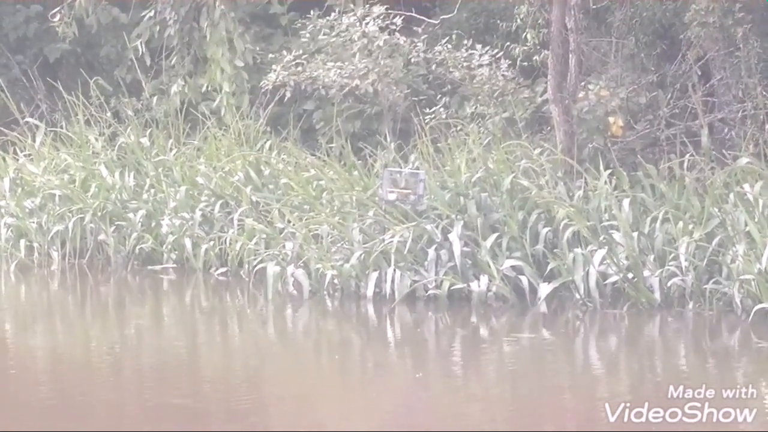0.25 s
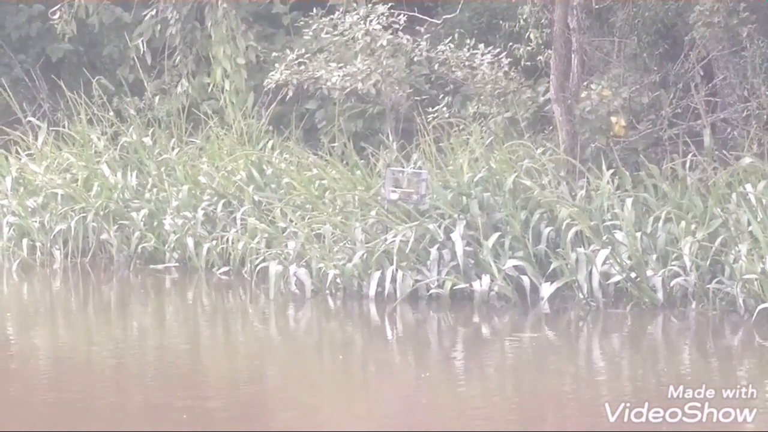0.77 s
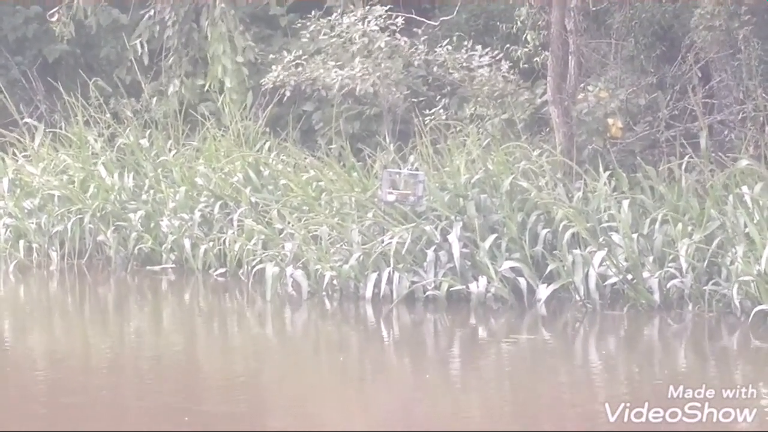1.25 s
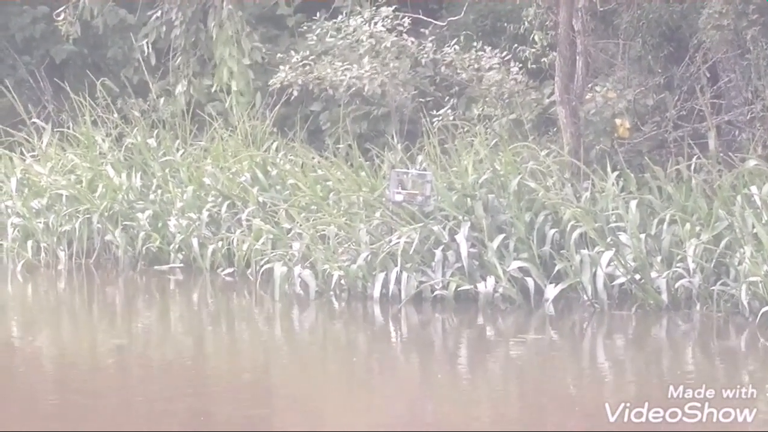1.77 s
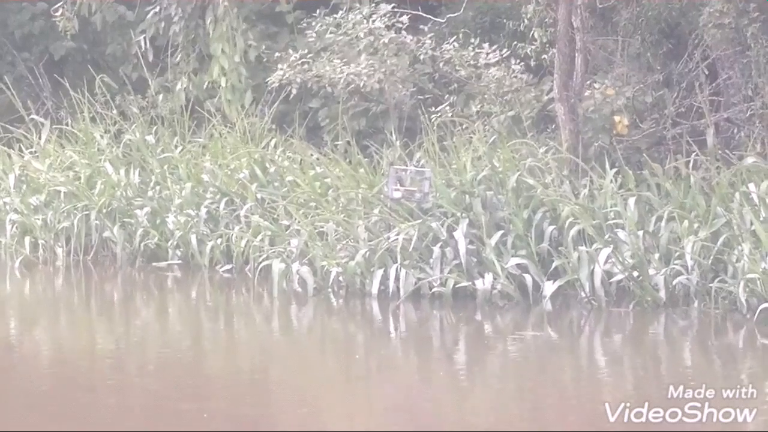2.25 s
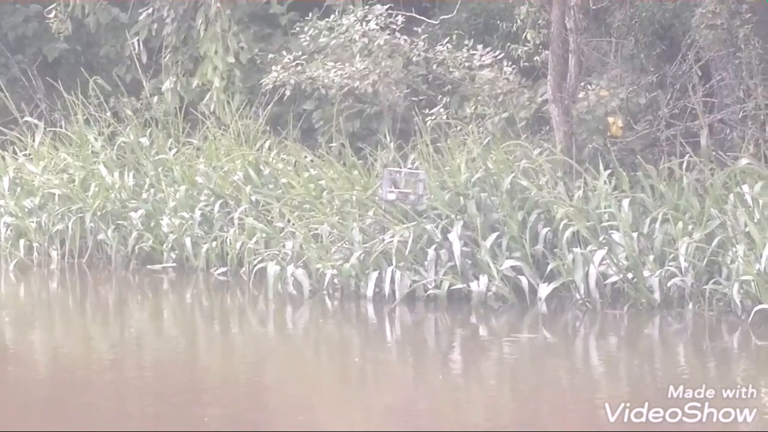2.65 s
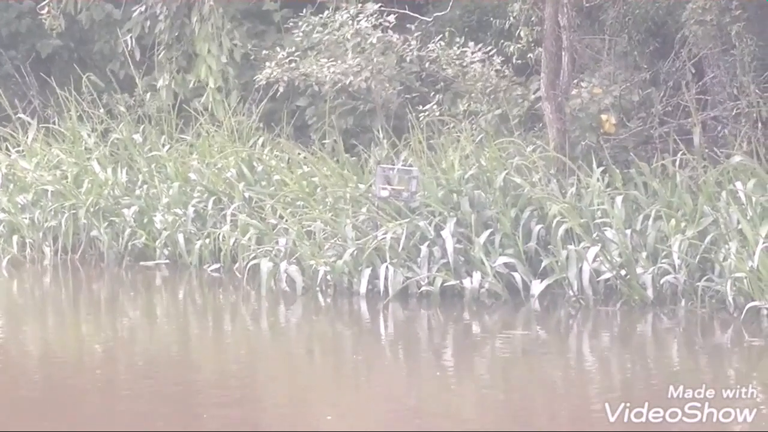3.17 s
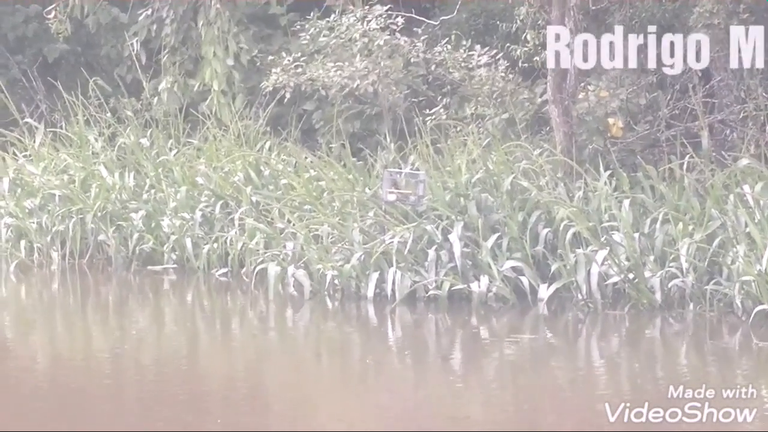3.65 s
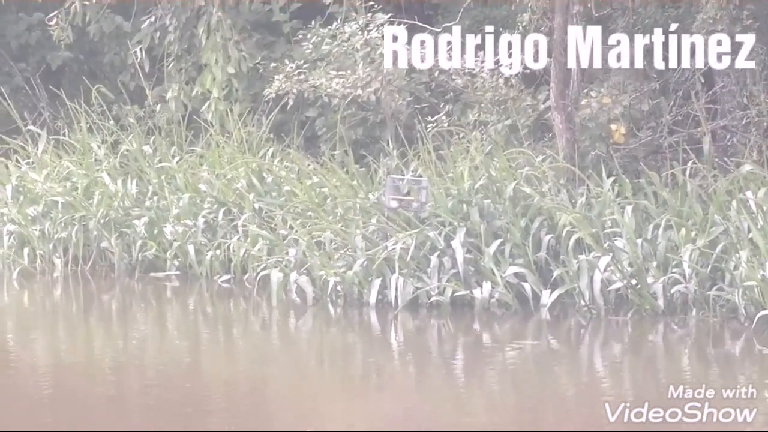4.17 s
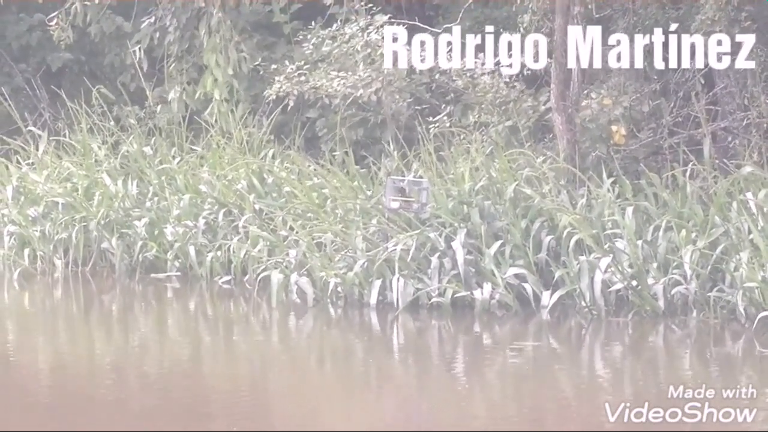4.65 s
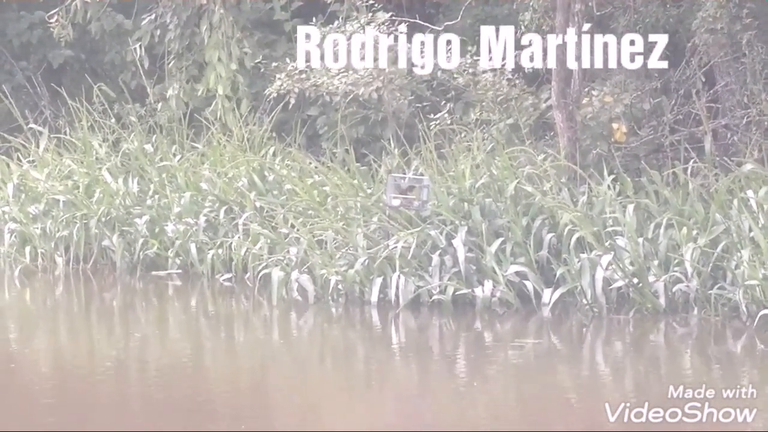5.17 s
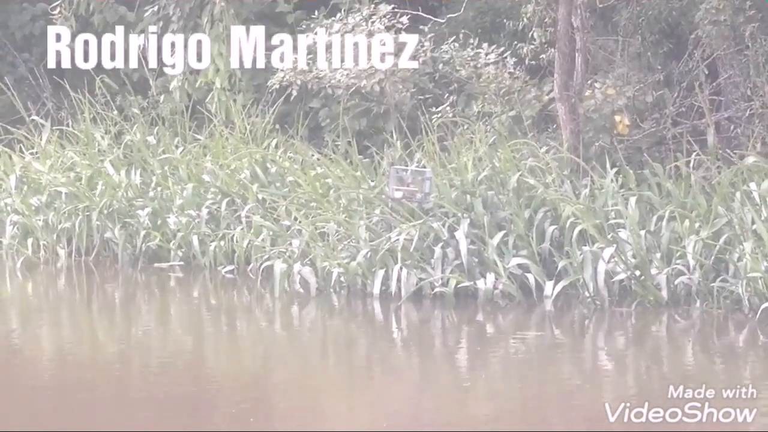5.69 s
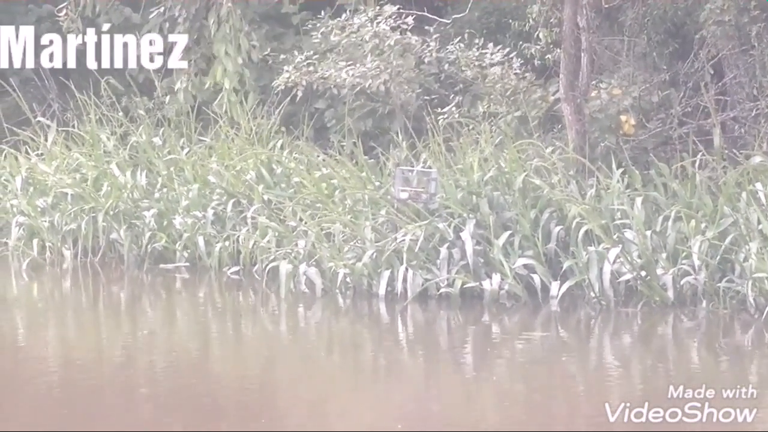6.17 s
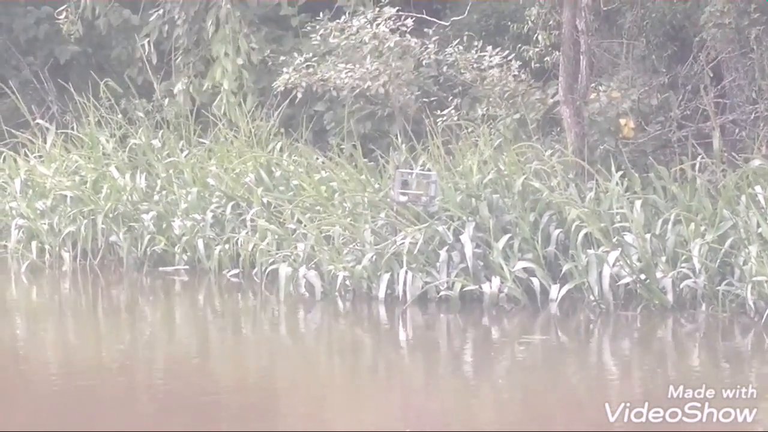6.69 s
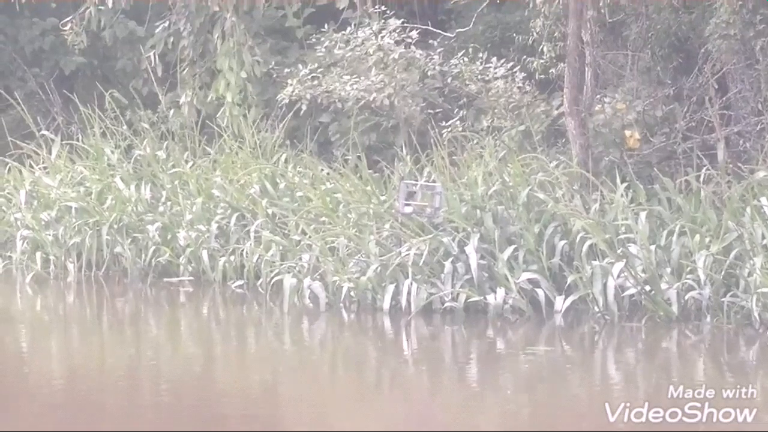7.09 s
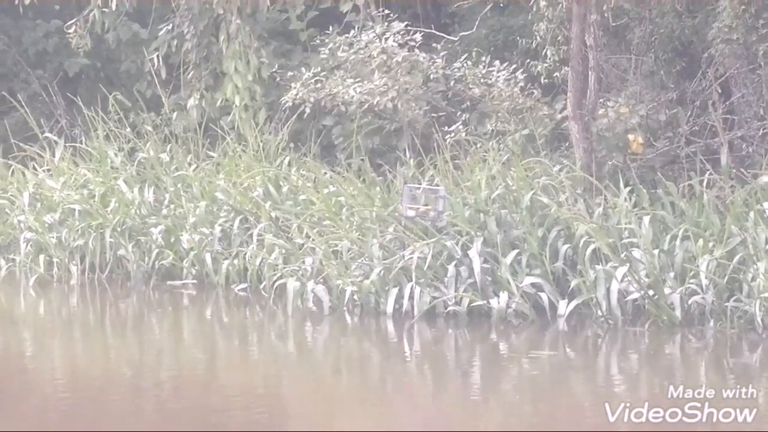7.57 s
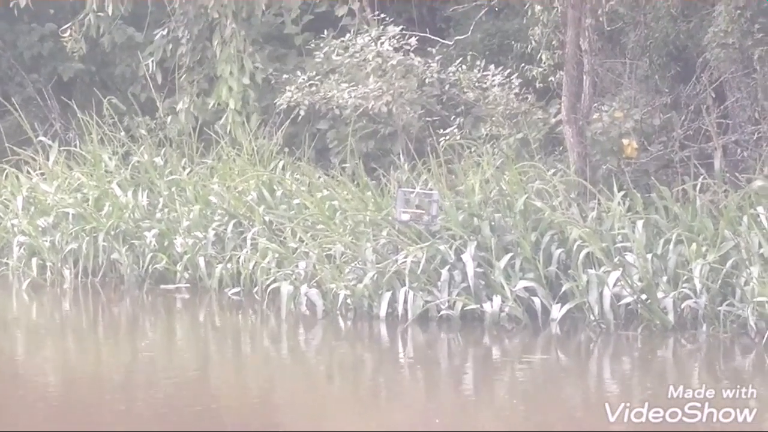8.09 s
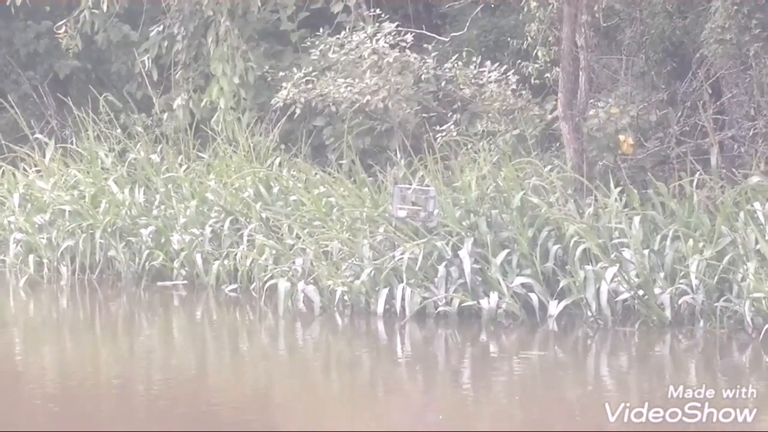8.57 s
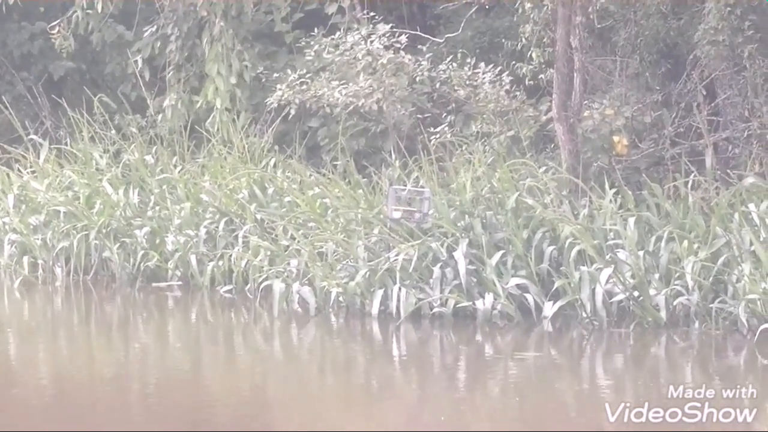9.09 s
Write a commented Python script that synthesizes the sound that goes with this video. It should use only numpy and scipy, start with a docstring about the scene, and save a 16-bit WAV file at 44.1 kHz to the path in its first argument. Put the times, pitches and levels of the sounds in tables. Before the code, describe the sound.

At a lagoon's wooded edge, a loud arched whistle opens over high pulsing insects on the left and soft forest hush. Chirps lead into a fast falling trill, a short warbling buzz and rasping chatter. After a quieter gap the whistle returns, then mostly insects, faint thin calls and tiny water plops remain. Low wind rumble and handling bumps sit mainly on the right of the stereo microphone.

```python
"""Songbirds at the wooded edge of a lagoon, built from gliding sines and harmonic stacks: two long arched
whistles, a trill, a falling buzz, rasping chatter, small chirps and, far off, twitters and low hoots.
Shaped noise and one pure tone make insects throb on the left; the water plops as rising, dying bubble tones.
Trees scatter the water and all calls but the hoots, as sparse random echoes.
Low noise gives the rumble of light wind and handling bumps on the microphone, over a steady forest hush."""
import sys
import numpy as np
from scipy import signal
from scipy.fft import rfft, irfft, next_fast_len
from scipy.io import wavfile
from scipy.ndimage import uniform_filter1d

SR = 44100
rng = np.random.default_rng(int(sys.argv[2]) if len(sys.argv) > 2 else 0)


def to_wav(s):
    """Save 16-bit WAV."""
    ch = np.atleast_2d(s).T  # columns
    pcm = np.round(np.clip(ch, -1, 1) * 32767)  # PCM
    wavfile.write(sys.argv[1], SR, pcm.astype(np.int16))


N = 411894
T = np.arange(N) / SR  # seconds
TOP_HZ = 14900  # upper limit of the recorder

# Spectra, normalised when used. Each row: frequency in Hz, relative level in dB.
# Forest hush: its body and its treble; the lists overlap, so their joining order matters.
HUSH_BODY = [(12, -23), (20, 1.5), (43, 5), (80, -3.5), (285, -12), (422, -12), (597, -17), (1580, -22),
             (3010, -22), (3970, -22.5), (5000, -23), (6500, -57.5), (11000, -120)]
HUSH_TREBLE = [(7000, -31), (9500, -21.5), (12500, -31), (15000, -42)]
INSECT_COLOUR = [(4800, -38.5), (5700, -20), (6150, -11), (6480, 0.5), (6750, -11), (7150, -8.5),
                 (7500, -21), (7900, -26), (8900, -24), (9300, -29.5), (12500, -40.5)]
RUMBLE_COLOUR = [(10, -16.0), (30, 5.0), (60, 2.0), (95, -3.0), (130, -14), (220, -26.5),
                 (600, -57), (3000, -69)]
HAZE_COLOUR = [(2700, -48), (3300, -2.0), (4000, -9.0), (4900, 0.5), (5300, -14.5), (7000, -31.5),
               (10000, -48.5)]
SPLASH_COLOUR = [(150, -8.0), (400, -3), (1200, -7.5), (2200, -15.0), (12000, -49.5)]
HISS_COLOUR = [(100, 3), (1500, 4.5), (5000, 7), (9000, -20.0), (15000, -40.5)]
# Throat response of the chatter. Each row: frequency in Hz, gain in dB.
CHATTER_THROAT = [(2500, -39.0), (3300, 2.5), (4600, 0), (6000, -0.5), (8000, -5.5), (10000, -22.0),
                  (14000, -36)]

# Handling bumps. Each row: start in seconds, length in seconds, level in dB before a 10 dB lift.
BUMPS = [(0.031, 0.059, -44), (0.176, 0.12, -65), (0.522, .1, -72), (1.06, 0.14, -63), (1.567, 0.042, -63),
         (5.712, 0.06, -66)]
# Rumble reaches the left capsule inverted and 24.5 dB weaker. Each row: gain of the left, then the right.
CAPSULES = np.array([[-10 ** (-24.5 / 20)], [1]])

# Insect chorus, joined by straight lines. Each row: time in seconds, level in dB.
INSECT_LEVEL = [(0.0, -61.5), (1.45, -59), (3.07, -70.5), (3.46, -62.5), (4.11, -66.5), (5.93, -63.5),
                (6.24, -69.5), (8.04, -68), (8.79, -61), (9.34, -60)]
THROB_HZ, THROB_DB = 13.4, 3.6  # mean rate and mean depth of the dips

# Slurred notes. Each row: start in seconds, length in seconds, start pitch in Hz, end pitch in Hz,
# level in dB, left minus right in dB.
SLURRED_NOTES = [(0.453, 0.34, 4400, 3425, -68.5, 36), (0.529, 0.055, 4234, 4120, -54, 32),
                 (1.04, 0.03, 3990, 6300, -54, -7), (1.364, 0.07, 6030, 3680, -47, -1.5),
                 (1.836, .27, 3950, 2750, -61, 18), (2.475, 0.073, 4460, 3610, -37.5, -2),
                 (3.247, 0.083, 4300, 3694, -44.5, -4), (3.375, 0.04, 4100, 3374, -45.5, 0),
                 (3.452, .037, 4140, 3800, -43, 1), (3.949, 0.0246, 2640, 2260, -71, 20),
                 (3.987, 0.13, 4280, 2733, -55, 5), (4.01, 0.056, 4020, 3517, -45.5, -7),
                 (6.14, 0.07, 4940, 3680, -45, -18)]
# High chips, all dropping by the same share. Each row: start in seconds, length in seconds,
# start pitch in Hz, level in dB, left minus right in dB.
CHIPS = [(0.708, 0.023, 7000, -63, -13), (1.21, .07, 6500, -55, -20), (3.646, 0.02, 6880, -53.5, -16),
         (3.807, 0.0178, 6130, -50, -8), (4.04, 0.039, 7200, -55, -2), (8.336, 0.019, 6240, -64, 20),
         (9.046, .018, 6270, -69, 20.5), (9.135, 0.015, 6150, -65, 15)]
CHIP_FALL = .09  # share of the start pitch
# A second bird ticks evenly behind the trill, louder towards the middle of its series.
TICK_START_S, TICK_STEP_S, TICK_S = 2.074, .0527, 0.017
TICK_TOP_HZ, TICK_END_HZ, TICK_DB, TICK_EDGE_DB, TICK_PAN_DB = 4275, 3580, -37, -9.5, -7.5
WOOD_T60_S = .25  # 60 dB decay of the echoes of the chirps, on the left

# Arched whistles. Each row: start in seconds, length in seconds, top pitch in Hz, share of the length
# before it sinks, level in dB, dip of the third harmonic at the top in dB.
WHISTLES = [(0.77, .654, 1698, .43, -35, -17), (5.522, .67, 1673, .35, -35, -9.5)]
# A whistle scoops up from below its top pitch and sinks again (shares of that pitch; scoop time in s).
SCOOP, SCOOP_S, SINK = 0.38, .039, .37

# Water plops. Each row: start in seconds, level in dB before a 4 dB lift, initial pitch in Hz,
# 60 dB decay time in seconds, splash relative to the tone in dB.
PLOPS = [(1.326, -54, 417, 0.037, -1), (2.586, -50, 413, 0.062, -4), (3.689, -55.5, 367, 0.048, -14),
         (4.302, -68.5, 1183, 0.081, -17), (4.701, -69.5, 492, .1, -21), (7.296, -60.5, 1160, 0.077, -23),
         (7.506, -61.5, 400, 0.06, 1), (8.076, -59, 436, 0.035, 6.5), (8.86, -55.5, 374, 0.044, -25.5)]

# Opening notes of the trill, before the throat. Each row: start in seconds, length in seconds,
# start pitch in Hz, end pitch in Hz, level in dB, left minus right in dB.
TRILL_OPENING = [(1.819, 0.032, 3820, 3520, -63.5, 26), (1.883, 0.026, 3850, 3700, -39.5, 32),
                 (1.961, 0.031, 3850, 3310, -38.5, 29), (2.019, 0.039, 3850, 3510, -32.5, 18),
                 (2.129, 0.066, 3806, 2946, -30.5, 12.5), (2.197, .036, 4050, 2900, -29, 11),
                 (2.293, 0.074, 3790, 2843, -29.5, 10)]
# The trill ends in an even run of steep notes, each reaching a little deeper; level before the throat.
RUN_START_S, RUN_STEP_S, RUN_NOTE_S = 2.368, .0643, 0.038
RUN_TOP_HZ, RUN_END_HZ, RUN_DEEPEN_HZ, RUN_DB, RUN_PAN_DB = 4194, 2778, 40, -27.5, 12

# Rasping upward chatter. Each row: start in seconds, level in dB, left minus right in dB,
# pitch roughness as a relative factor.
CHATTER = [(3.036, -54, 14, 0.24), (3.147, -50, 18, 0.34), (3.273, -44.5, 30, 0.068),
           (3.353, -45, 32, 0.013), (3.448, -45.5, 26, 0.02), (3.548, -47.5, 35, 0.017),
           (3.676, -51, 36, 0.039)]
# Thin whistles from deeper in the wood. Each row: start in seconds, length in seconds,
# start pitch in Hz, end pitch in Hz.
THIN_CALLS = [(3.725, 0.13, 3650, 4580), (4.94, 0.064, 4860, 3830), (5.09, .041, 4500, 3810),
              (6.48, 0.18, 3810, 4530), (7.0, 0.16, 4920, 3700), (7.273, 0.091, 4470, 3810),
              (7.65, .05, 4600, 3600), (7.98, 0.036, 4330, 3570), (9.06, .035, 5300, 4300),
              (9.168, 0.027, 5200, 4000)]
THIN_DB, THIN_PAN_DB = -80.5, 16
# Far twitters. Each row: start in seconds, length in seconds, mean pitch in Hz, mean level in dB.
TWITTERS = [(3.822, 0.072, 5900, -56), (8.499, .72, 3860, -78), (8.66, 0.12, 8100, -70),
            (9.05, 0.2, 4900, -75.5)]
# Distant low hoots. Each row: start in seconds, length in seconds, mean pitch in Hz, level in dB.
HOOTS = [(5.748, 0.6, 420.3, -71), (7.952, 0.62, 447, -76.5)]


def undb(db):
    """Decibels are logarithmic: 20 dB is a tenfold amplitude."""
    return 10 ** (np.asarray(db) / 20)


def unit(x):
    """Dividing by the root mean square gives unit rms."""
    return x / np.sqrt(np.mean(x ** 2))


def curve(rows):
    """Linear interpolation in time of each column of a table."""
    s, *columns = np.transpose(rows)
    return [np.interp(T, s, c) for c in columns]


def pan(db):
    """A level difference between the ears places a source: left and right gains of mean 1."""
    return 2 * np.array([[undb(db)], [1]]) / (1 + undb(db))


def add(out, s, x):
    """Superposition: sounds add linearly, here from time s onward."""
    i = max(int(s * SR), 0)
    out[:, i:i + x.shape[-1]] += x[..., :N - i]


def noise(colour, size=N):
    """Spectral shaping of white noise by (Hz, dB) points on a log frequency axis, at unit rms."""
    hz, db = np.transpose(colour)
    n = next_fast_len(size, True)
    f = np.maximum(np.fft.rfftfreq(n, 1 / SR), 1)
    gain = undb(np.interp(np.log(f), np.log(hz), db))
    return unit(irfft(rfft(rng.standard_normal(n)) * gain, n)[:size])


def walk(rate, size=N):
    """Band-limited chance: random points at the given rate in Hz, joined and smoothed."""
    k = int(SR / rate)
    points = rng.standard_normal(size // k + 2)
    return uniform_filter1d(np.interp(np.arange(size) / k, np.arange(size // k + 2), points), k)


def phase_of(hz):
    """Phase is the running integral of frequency."""
    return 2 * np.pi * np.cumsum(hz) / SR


def swell(length, peak):
    """Amplitude envelope: progress 0-1 through a note, and a half sine warped to top at the share peak."""
    u = np.linspace(0, 1, int(length * SR))
    return u, np.sin(np.pi * np.interp(u, [0, np.clip(peak, .05, .95), 1], [0, .5, 1]))


def hush(left_db=-67.0, right_db=-70.0):
    """Diffuse sound: the forest hush is independent noise on the two sides."""
    colour = HUSH_BODY + HUSH_TREBLE
    return np.array([undb(db + 0.6 * walk(3.2)) * noise(colour) for db in (left_db, right_db)])


def wind(start_db=-72, calming_db_per_s=-2.26):
    """Wind rumble: a dying breeze pushes the capsules opposite ways, most of all the right one."""
    level_db = start_db + calming_db_per_s * T + 2 * walk(8.4)
    return undb(level_db) * noise(RUMBLE_COLOUR) * CAPSULES


def handling():
    """Structure-borne noise: each handling bump is a short swell of the same low rumble."""
    out = np.zeros((2, N))
    for s, length, db in BUMPS:
        u, env = swell(length, 0.18)
        rumble = unit(noise(RUMBLE_COLOUR, SR)[:len(u)])
        add(out, s, undb(db + 10) * env * rumble * CAPSULES)
    return out


def insects(tone_hz=6490, tone_db=-2, band_db=1.0, rasp_db=2.0, split_hz=6950, shimmer_db=-64):
    """Amplitude modulation: a rasping chorus and one pure singer dip together; the top band only shimmers."""
    db, = curve(INSECT_LEVEL)
    stroke = phase_of(THROB_HZ * (1 + .06 * walk(5)))
    gap_db = -THROB_DB * (1 + .6 * walk(1.5)) * np.cos(stroke / 2) ** 4
    rasp = noise(INSECT_COLOUR)
    low = signal.sosfiltfilt(signal.butter(10, split_hz, fs=SR, output="sos"), rasp)
    chorus = undb(band_db + gap_db + rasp_db * walk(150)) * low
    singer_level = np.sqrt(2) * undb(tone_db + gap_db + 2 * walk(9.1))
    singer = singer_level * np.sin(phase_of(tone_hz + 10 * walk(30)))
    shimmer = undb(shimmer_db + 1.3 * walk(120)) * (rasp - low)
    near = (undb(db) * (chorus + singer) + shimmer) * pan(31)
    # a steady faint chorus on both sides
    far = undb(-79) * np.array([noise(INSECT_COLOUR), noise(INSECT_COLOUR)])
    return near + far


def slurs(rows, peak, bend, attack, release, waver):
    """Frequency glide of a nearly pure tone; a bend below 1 glides fast at first and then eases off."""
    out = np.zeros((2, N))
    for s, length, start_hz, end_hz, db, pan_db in rows:
        u, env = swell(length, peak)
        hz = (start_hz + (end_hz - start_hz) * u ** bend) * (1 + waver * walk(200, len(u)))
        fade = np.abs(env) ** np.where(u < peak, attack, release)
        add(out, s, np.sqrt(2) * undb(db) * fade * np.sin(phase_of(hz)) * pan(pan_db))
    return out


def chirps(count=7):
    """Short linear glides: the neighbours' even series of ticks, slurs and high chips."""
    ticks = []
    for k, edge in enumerate(np.linspace(-1, 1, count)):
        db = TICK_DB + TICK_EDGE_DB * edge ** 2
        ticks.append((TICK_START_S + k * TICK_STEP_S, TICK_S, TICK_TOP_HZ, TICK_END_HZ, db, TICK_PAN_DB))
    chips = [(s, length, hz, hz * (1 - CHIP_FALL), db, pan_db) for s, length, hz, db, pan_db in CHIPS]
    notes = ticks + SLURRED_NOTES + chips
    return slurs(notes, peak=0.45, bend=1.0, attack=1.0, release=0.66, waver=.017)


def trees(x, wet_db, t60, right_db=-2, lag=0.00025, right_decay=0.29, onset_s=0.0029, steepen=2.1,
          count=260):
    """Multiple scattering: trunks and leaves return echoes that fade ever faster, sooner on the right.

    A lag in seconds delays the sound at the right ear."""
    t = np.arange(int(.5 * SR)) / SR
    direct = (x[0], np.roll(x[1], int(lag * SR)))
    out = []
    for side, db, decay in zip(direct, (wet_db, wet_db + right_db), (t60, t60 * right_decay)):
        echoes = np.zeros(len(t))
        echoes[rng.integers(0, len(t), count)] = rng.choice([-1, 1], count)
        echoes *= np.exp(-np.log(1000) * (t / decay) ** steepen) * (1 - np.exp(-t / onset_s))
        heard = 0.95 * side + 0.36 * x.mean(0)
        scattered = signal.fftconvolve(heard, echoes / np.linalg.norm(echoes))[:N]
        out.append(side + undb(db) * scattered)
    return np.array(out)


def whistle(start, length, top_hz, hold, db, dip_db, second_fade_db=-190, third_db=-1.0, dip_width=0.061,
            attack_s=0.019, release_s=0.089, pan_db=-8, leak_db=-39, waver=0.0014, rough_db=0.35,
            haze_db=-25):
    """Harmonic filtering: near the top of the arch the second harmonic takes over from the third.

    The throat only leaks the first and fifth harmonics."""
    t = np.arange(int(length * SR)) / SR
    sinking = np.clip((t / length - hold) / (1 - hold), 0, 1) ** 2
    below = SCOOP * np.exp(-t / SCOOP_S) + SINK * sinking
    hz = top_hz * (1 - below)
    phase = phase_of(hz * (1 + waver * walk(300, len(t))))
    second = undb(second_fade_db * below)
    third = undb(third_db + dip_db * np.exp(-(below / dip_width) ** 2))
    leak = undb(leak_db) * (np.sin(phase) + undb(-4.5) * np.sin(5 * phase))
    voice = second * np.sin(2 * phase) + np.sqrt(second) * leak + third * np.sin(3 * phase)
    # a faint noisy haze fills the band between the two tones
    voice = voice + undb(haze_db) * (second + third) * noise(HAZE_COLOUR, len(t))
    env = np.minimum(t / attack_s, 1) * np.minimum((length - t) / release_s, 1)
    level = np.sqrt(2) * undb(db + rough_db * walk(220, len(t)))
    out = np.zeros((2, N))
    add(out, start, level * env * voice * pan(pan_db))
    return out


def water(glide_per_s=9.5, pan_db=7):
    """Bubble resonance: a plop is a tone whose pitch rises as it dies, with a short splash."""
    out, t = np.zeros((2, N)), np.arange(SR // 5) / SR
    for s, db, hz, t60, splash_db in PLOPS:
        env = np.exp(-np.log(1000) * t / t60) * (1 - np.exp(-t / 0.0012))
        bubble = np.sin(phase_of(hz * (1 + glide_per_s * t)))
        splash = undb(splash_db) * noise(SPLASH_COLOUR, len(t))
        add(out, s, undb(db + 4) * env * (bubble + splash) * pan(pan_db))
    return out


def trill(throat_hz=3550, width_hz=1000, gain_db=2.0, count=6):
    """Resonance: falling notes, ending in a quick run, flare as they glide through the throat's peak."""
    run = []
    for k in range(count):
        end_hz = RUN_END_HZ - k * RUN_DEEPEN_HZ
        run.append((RUN_START_S + k * RUN_STEP_S, RUN_NOTE_S, RUN_TOP_HZ, end_hz, RUN_DB, RUN_PAN_DB))
    notes = slurs(TRILL_OPENING + run, peak=.35, bend=.8, attack=.9, release=1.3, waver=.008)
    b, a = signal.iirpeak(throat_hz, throat_hz / width_hz, fs=SR)
    return undb(gain_db) * signal.lfilter(b, a, notes)


def buzz(start=2.897, length=.28, start_hz=4930, end_hz=3990, bend=1.0, peak=0.86, flutter_hz=86,
         depth_hz=210, db=-37.0, soft_db=-22, pan_db=-5):
    """Joint frequency and amplitude modulation: a fast warble on a falling note that swells late."""
    u, env = swell(length, peak)
    flutter = phase_of(flutter_hz * (1 + 0.049 * walk(41.5, len(u))))
    hz = start_hz + (end_hz - start_hz) * u ** bend + depth_hz * np.sin(flutter)
    level = undb(db + soft_db * (1 - u) ** 2) * env * (1 - 0.58 * np.cos(flutter))
    out = np.zeros((2, N))
    add(out, start, level * np.sin(phase_of(hz)) * pan(pan_db))
    return out


def chatter(length=.04, start_hz=1550, rise_hz=2900, bend=4.2):
    """Source and filter: a harmonic stack sweeps up ever faster through the throat, roughening at the top."""
    out = np.zeros((2, N))
    throat_hz, throat_db = np.transpose(CHATTER_THROAT)
    for s, db, pan_db, rough in CHATTER:
        u, env = swell(length, 0.88)
        sweep_hz = start_hz + rise_hz * (u + 3 * u ** bend) / 4
        hz = sweep_hz * (1 + rough * (0.41 + u) * walk(1500, len(u)))
        phase = phase_of(hz)
        stack = np.zeros(len(u))
        for k in range(2, 7):
            gain = undb(np.interp(k * hz, throat_hz, throat_db) - 2.4 * (k - 2.5))
            stack += gain * (k * hz < TOP_HZ) * np.sin(k * phase)
        add(out, s, undb(db) * np.abs(env) ** 0.88 * stack * pan(pan_db))
    return out


def thin_calls():
    """Frequency glides that ease off, faint and from far off on the left."""
    rows = [(*row, THIN_DB, THIN_PAN_DB) for row in THIN_CALLS]
    return slurs(rows, peak=0.49, bend=.5, attack=0.26, release=0.51, waver=0.0066)


def twitters(spread=0.059, pan_db=11):
    """Random frequency modulation: far birds whose pitch and strength flit too fast to follow."""
    out = np.zeros((2, N))
    for s, length, hz, db in TWITTERS:
        u, env = swell(length, 1.0)
        flit = np.sin(phase_of(hz * (1 + spread * walk(400, len(u)))))
        level = undb(db + 1.6 * walk(45, len(u))) * np.sqrt(np.abs(env))
        add(out, s, level * flit * pan(pan_db))
    return out


def hoots():
    """Pure tones: soft notes from far off, with only a slight waver in pitch."""
    out = np.zeros((2, N))
    for s, length, hz, db in HOOTS:
        u, env = swell(length, 0.22)
        add(out, s, undb(db) * env * np.sin(phase_of(hz * (1 + 0.016 * walk(29, len(u))))))
    return out


def song_hiss(birds):
    """Level-dependent noise: a faint broad hiss follows the loudness of the song, compressed."""
    loudness = np.sqrt(uniform_filter1d(birds.mean(0) ** 2, size=2000).clip(0))
    hiss = np.array([noise(HISS_COLOUR) for _ in range(2)])
    return undb(-49.5) * loudness ** 0.41 * hiss


def scene():
    """Superposition of the birds among the trees, insects, water and air."""
    whistles = sum(whistle(*row) for row in WHISTLES)
    birds = trees(whistles, wet_db=-2.5, t60=0.22, right_db=-3, lag=0, count=700)
    birds += trees(trill(), wet_db=-7.5, t60=0.2, count=500)
    birds += trees(chirps(), wet_db=-3, t60=WOOD_T60_S)
    birds += trees(buzz(), wet_db=-4, t60=0.26)
    birds += trees(chatter(), wet_db=-3.0, t60=0.12)
    birds += trees(twitters() + thin_calls(), wet_db=0.5, t60=0.16)
    plops = trees(water(), wet_db=-14.5, t60=0.33)
    air = hush() + wind() + handling()
    return birds + song_hiss(birds) + insects() + plops + hoots() + air


def record(dry):
    """Band limiting: the recorder cuts the top with a steep low-pass."""
    return signal.sosfilt(signal.ellip(8, .2, 70, TOP_HZ, fs=SR, output="sos"), dry)


dry = scene()
out = record(dry)
to_wav(out)
```